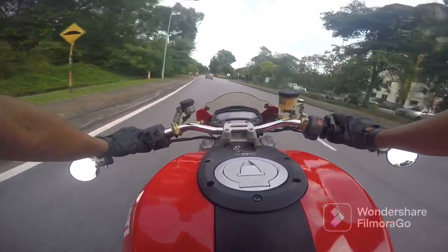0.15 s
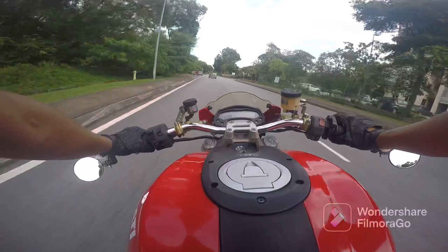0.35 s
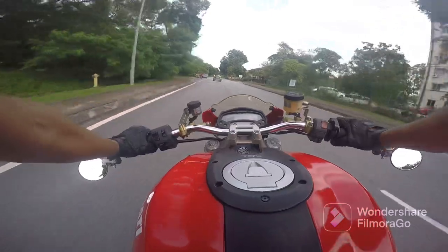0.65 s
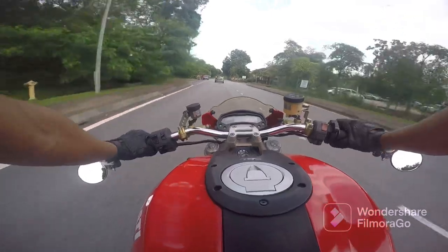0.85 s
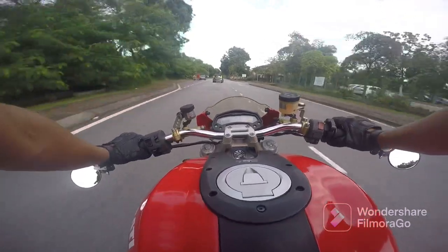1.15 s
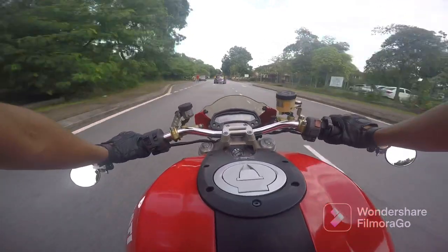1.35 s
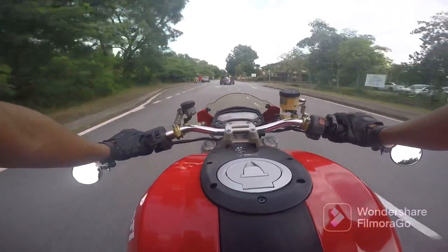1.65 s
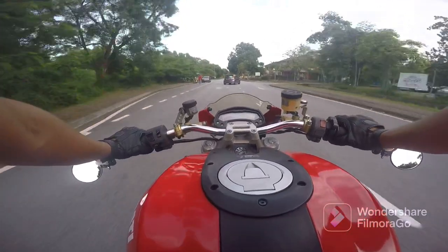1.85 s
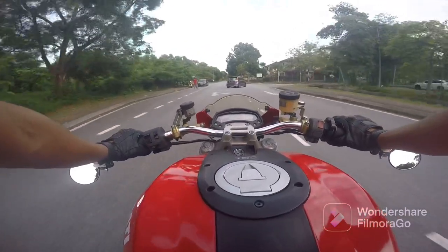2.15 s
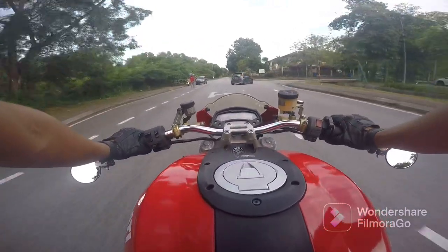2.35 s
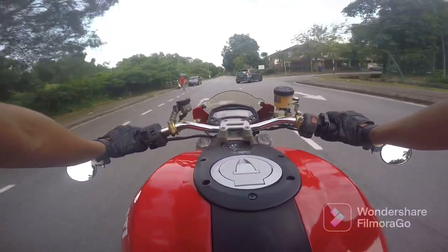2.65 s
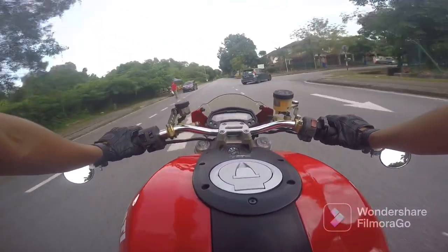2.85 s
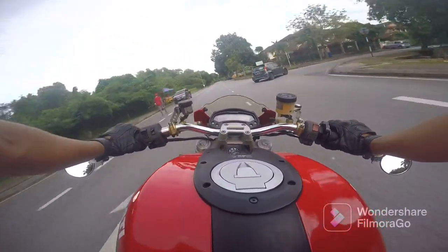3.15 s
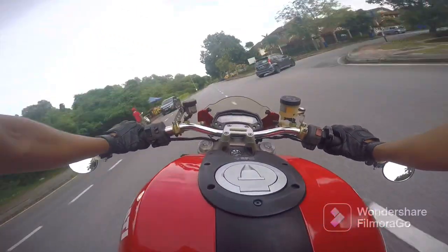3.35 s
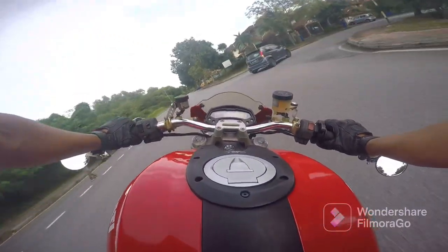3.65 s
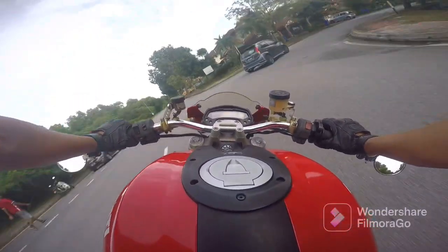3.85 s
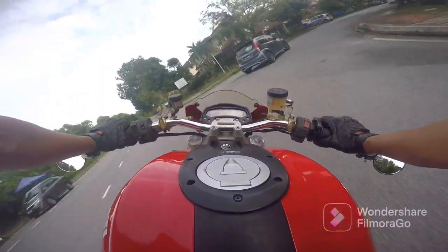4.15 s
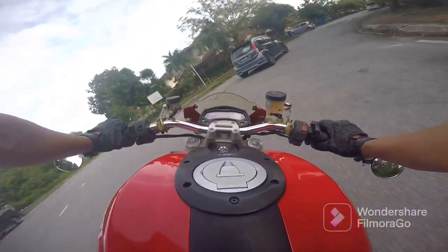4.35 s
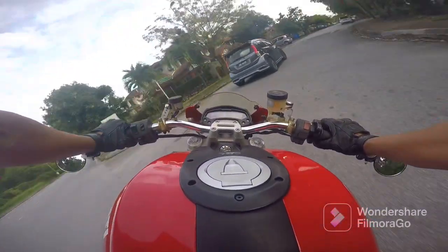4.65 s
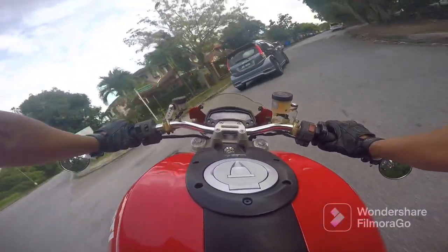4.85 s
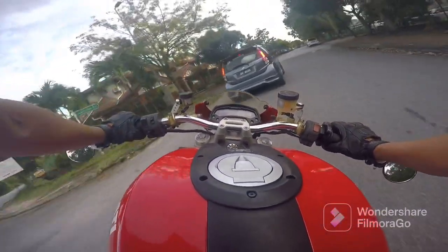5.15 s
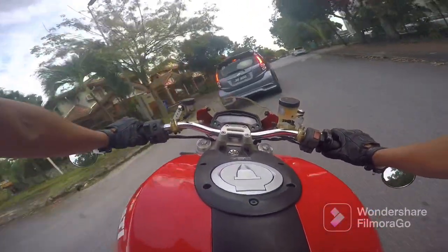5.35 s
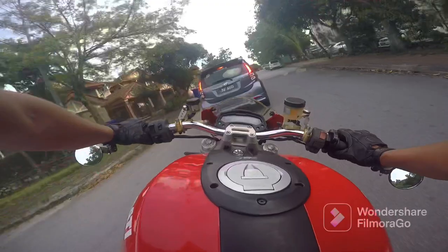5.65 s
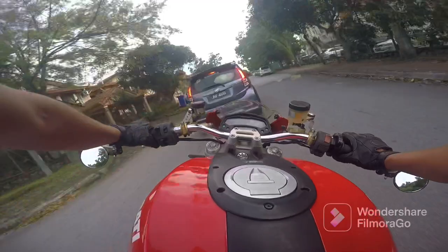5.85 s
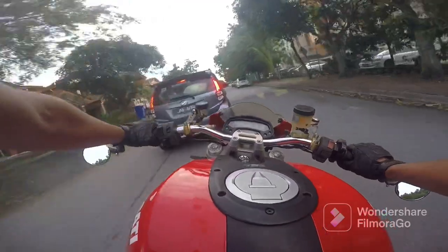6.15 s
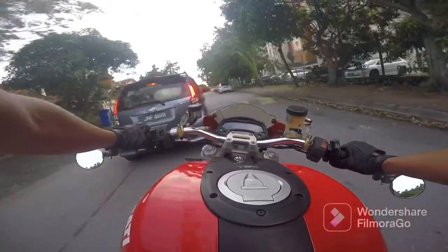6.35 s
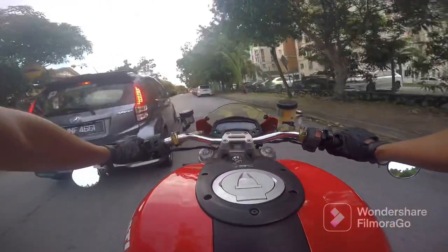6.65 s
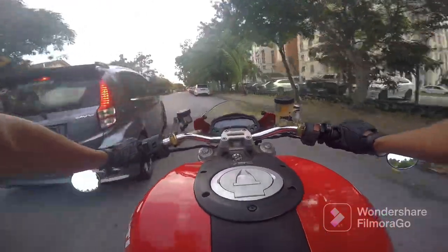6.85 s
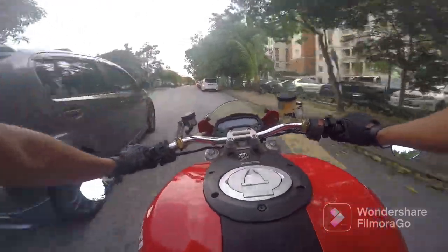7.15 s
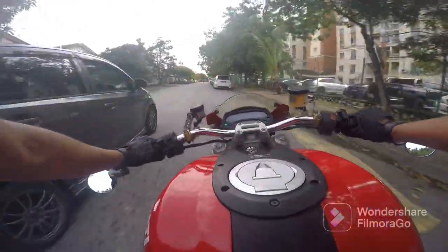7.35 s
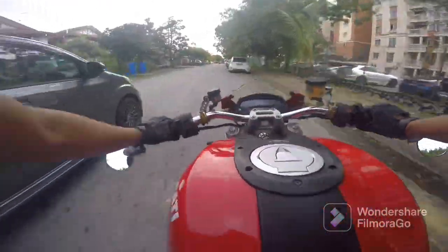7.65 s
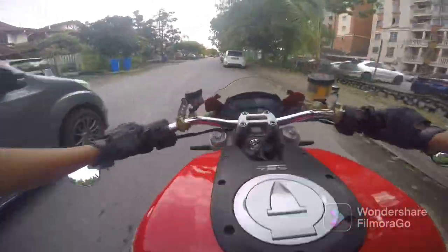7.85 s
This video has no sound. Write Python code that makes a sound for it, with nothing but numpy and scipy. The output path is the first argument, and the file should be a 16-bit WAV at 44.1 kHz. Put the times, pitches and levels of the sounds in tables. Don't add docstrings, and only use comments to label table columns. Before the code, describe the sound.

Heard from a sealed microphone on the rider's chest, a twin motorcycle's uneven exhaust beat dominates over metallic engine clatter and low wind buffeting. Two quick blips come early, with crackling pops, then the revs sink steadily through a bend to a slow, loose thudding. A short blip with a bang follows, and firmer, sharper beats pull away beside a car.

```python
import sys
import numpy as np
from scipy import signal
from scipy.fft import rfft, irfft, next_fast_len
from scipy.io import wavfile
from scipy.ndimage import uniform_filter1d

SR = 44100
rng = np.random.default_rng(int(sys.argv[2]) if len(sys.argv) > 2 else 0)


def dump_mix(stems):
    frames = np.atleast_2d(stems).T
    limited = np.clip(frames, -1, 1)
    pcm = np.round(limited * 32767).astype(np.int16)
    wavfile.write(sys.argv[1], SR, pcm)


def amplitude_ratio(level_db):
    exponent = np.asarray(level_db, float) / 20
    return 10 ** exponent


N = 351918
TIME = np.arange(N) / SR

# time_s, rate_hz (four-stroke cycles per second)
ENGINE_SPEED = [(0.0, 29.08), (0.568, 26.89), (0.7, 26.97), (0.815, 31.5), (1.037, 24.78), (1.234, 31.06),
                (1.926, 28.25), (3.049, 25.07), (3.749, 24.26), (4.495, 21.1), (5.662, 14.94),
                (6.011, 14.93), (6.355, 12.2), (6.442, 17.42), (6.539, 17.33), (6.794, 13.88),
                (7.055, 12.99), (7.804, 15.3), (7.98, 14.1)]


def curves(table):
    s, *columns = np.transpose(table)
    return [np.interp(TIME, s, c) for c in columns]


def unit(x):
    return x / np.sqrt(np.mean(x ** 2))


def ring(x, hz, width):
    r = np.exp(-np.pi * width / SR)
    w = 2 * np.pi * hz / SR
    return signal.lfilter([0, r * np.sin(w)], [1, -2 * r * np.cos(w), r * r], x)


def body(x, modes):
    return sum(amplitude_ratio(db) * ring(x, hz, width) for hz, width, db in modes)


def clicks(times, sizes):
    place = np.clip(np.asarray(times) * SR, 0, N - 2)
    i, part = place.astype(int), place % 1
    return np.bincount(i, sizes * (1 - part), N) + np.bincount(i + 1, sizes * part, N)


def colour(x, points):
    hz, db = np.transpose(points)
    size = next_fast_len(N)
    f = np.log(np.maximum(np.arange(size // 2 + 1) * SR / size, 1))
    gain = amplitude_ratio(np.interp(f, np.log(hz), db))
    return irfft(rfft(x, size) * gain, size)[:N]


def walk(rate):
    k = int(SR / rate)
    steps = np.repeat(rng.standard_normal(N // k + 1), k)
    return unit(uniform_filter1d(uniform_filter1d(steps, k), k)[:N])


def soften(x, top_hz, order=2):
    return signal.sosfilt(signal.butter(order, top_hz, fs=SR, output="sos"), x)


def fade(x, tau_s):
    return signal.lfilter([1], [1, -np.exp(-1 / (tau_s * SR))], x)


def hump(start_s, peak_s, end_s, db):
    return db * np.interp(TIME, [start_s, peak_s, end_s], [0, 1, 0])


def opening_db():
    return 4 * np.exp(-TIME / .004)


def cooling():
    return hump(4.7, 5.03, 6.3, 0.73)


def wind():
    # time_s, level_db
    gust = [(0, -31), (1.3, -46), (3.5, -42.5), (4.25, -42.5), (4.9, -44.5), (6.3, -46.5), (7.4, -46.5),
            (7.98, -46)]
    # frequency_hz, density_db
    buffeting = [(12, -18), (28, 9.5), (48, 1), (70, -8), (120, -10), (200, -33), (500, -31), (1000, -56.5)]
    level_db = curves(gust)[0] + opening_db() + 1.5 * walk(5.0)
    return amplitude_ratio(level_db) * unit(colour(rng.standard_normal(N), buffeting))


def whistle():
    return amplitude_ratio(-97) * np.sin(2 * np.pi * 15081 * TIME)


def grit():
    # time_s, level_db
    specks = [(6.1816, -68), (6.2016, -65), (6.3912, -66), (6.4141, -63), (6.9349, -70), (7.0083, -69),
              (7.0542, -71), (7.0891, -71), (7.132, -72), (7.1614, -68), (7.2343, -70), (7.4942, -65),
              (7.5331, -60), (7.6378, -64), (7.7301, -66), (7.789, -65), (7.8608, -62), (7.9232, -61)]
    # time_s, level_db
    scuffs = [(6.38, -64), (6.405, -66), (6.414, -68), (7.232, -63), (7.24, -60), (7.493, -60),
              (7.897, -55), (7.925, -60)]
    # time_s, level_db
    pings = [(7.232, -56), (7.243, -72), (7.255, -75), (7.28, -73), (7.288, -73), (7.38, -77)]
    speck_hue = [(8000, -25), (10300, -7), (12500, 0), (15000, -6)]
    scuff_hue = [(4800, -25), (6000, -2), (7500, 4), (9500, -17), (12000, -25)]
    layers = 0
    for table, tau_s, points in ((specks, .005, speck_hue), (scuffs, .009, scuff_hue)):
        when, db = np.transpose(table)
        envelope = fade(clicks(when, amplitude_ratio(db - 4.5)), tau_s)
        layers = layers + envelope * unit(colour(rng.standard_normal(N), points))
    when, db = np.transpose(pings)
    return layers + ring(clicks(when, amplitude_ratio(db)), 12450, 45)


def ticks():
    # time_s, level_db
    rattles = [(.001, -41), (0.169, -37), (.35, -52), (.75, -41), (.79, -43), (6.384, -51), (6.404, -40),
               (6.41, -54), (7.232, -50), (7.535, -45)]
    hue = [(500, -18.0), (900, -1), (1600, 15.5), (2000, 13), (2450, 25), (3000, 8.5),
           (3800, 16), (4800, -18), (9000, -40)]
    when, db = np.transpose(rattles)
    rise_s, decay_s = .0015, .003
    burst = unit(fade(fade(clicks(when, amplitude_ratio(db)), decay_s), rise_s)) * amplitude_ratio(-63)
    return burst * unit(colour(rng.standard_normal(N), hue))


def gears(turn):
    # time_s, level_db
    whine = [(0, -55), (2.4, -59.5), (2.75, -56), (3.15, -53), (3.4, -59), (4.3, -60), (4.7, -58.5),
             (5.2, -76), (7.98, -87)]
    wobble = np.cumsum(25 * walk(30) + 70 * walk(350)) / SR
    return amplitude_ratio(curves(whine)[0] + 2.1 * walk(60)) * np.sin(2 * np.pi * (65 * turn + wobble))


def drone(turn):
    crest_turn, cold_shift_turn = .11, .045
    warm_share, braking_ends_s = .45, 5.4
    cold = cooling()
    braking = np.clip(2 * (braking_ends_s - TIME), 0, 1)
    share = np.maximum(cold, warm_share * braking)
    return amplitude_ratio(-33) * share * np.cos(2 * np.pi * 3 * (turn + crest_turn + cold_shift_turn * cold))


def clatter(turn, count=48):
    # time_s, level_db
    rattle = [(0, -45), (1.2, -45), (2.4, -46), (3.6, -46.5), (4.8, -49), (5.8, -52), (6.31, -52),
              (6.41, -49.5), (6.75, -51), (7.3, -50), (7.8, -48.5), (7.98, -46)]
    # frequency_hz, width_hz, level_db
    case_modes = [(760, 140, -10.5), (1028, 157, -8.5), (1287, 210, -13), (1694, 147, -8.5),
                  (1872, 267, -8.5), (2292, 82, -3), (2529, 257, -3.5), (3378, 305, -6.5), (3656, 160, -2),
                  (4077, 447, -6.5), (4590, 35, -9)]
    # frequency_hz, start_s, peak_s, end_s, level_db
    case_swells = [(2407, -0.5, 1.8, 2.5, 1), (3650, -2.1, 1.4, 5.3, 0), (3370, 1.5, 3.5, 5.5, 2.5),
                   (1026, 1, 1.7, 4.3, 1.5), (773, 0.5, .01, 0.078, 24), (3370, 0, 0.98, 1.4, -5),
                   (1257, 5, 7.2, 10, -3.0), (3370, 6, 6.42, 7.7, 1)]
    # frequency_hz, density_db
    treble_hue = [(4300, 11.5), (4900, -27), (5250, -16), (5630, -2.5), (5900, -12), (6280, -4), (6900, -5),
                  (7460, -2.5), (8200, -10), (9000, -11), (10000, -20)]
    # frequency_hz, density_db
    top_hue = [(8500, -38), (9900, 7.5), (10600, 4), (11500, 5), (12300, -6), (13200, 0), (15100, -22),
               (15400, -36)]

    clatter_db = curves(rattle)[0] + opening_db()
    bright_db = clatter_db + .3 * (clatter_db - np.median(clatter_db))
    scrub_db = hump(2.4, 4.4, 6.0, 3.5)
    reflected_db = hump(7.1, 7.8, 9.9, 8.5)
    slowing_db = hump(4.8, 6.7, 7.4, -4)
    treble_db = bright_db - 16 + scrub_db
    top_db = bright_db - 35 + .5 * scrub_db + reflected_db + slowing_db

    angle, size = rng.random(count), rng.standard_normal(count)
    chance = rng.standard_normal((int(turn[-1]) + 1, count, 2))
    strike_turn = np.arange(len(chance))[:, None] + angle + 0.0013 * chance[..., 0]
    when = np.interp(strike_turn, turn, TIME)
    strength = size * amplitude_ratio(0.29 * chance[..., 1])
    taps = unit(clicks(when.ravel(), strength.ravel()))

    throb_db = np.interp(curves(ENGINE_SPEED)[0], [13, 18], [1.8, .8])
    throb = np.cos(2 * np.pi * (turn + .12)) + .6 * np.cos(4 * np.pi * (turn + .07))
    swell = amplitude_ratio(throb_db * throb)
    shudder_db = 0.2 * walk(16)

    mids = 0
    for hz, width, db in case_modes:
        drive = swell * (.65 * min(hz / 1700, 1) * taps + rng.standard_normal(N))
        case_swell_db = sum(hump(*span) for near, *span in case_swells if abs(hz / near - 1) < .06)
        tone = unit(ring(ring(drive, hz, 1.48 * width), hz, 1.48 * width))
        level_db = db + case_swell_db + 1.35 * walk(2.967) + 1.0 * walk(14)
        mids = mids + amplitude_ratio(level_db) * np.sqrt(width) * tone

    hiss, fizz = (swell ** .6 * amplitude_ratio(.8 * walk(24)) * (0.6 * taps + rng.standard_normal(N)) for _ in range(2))
    treble = unit(colour(hiss, [(3500, -57)] + treble_hue + [(12000, -57)]))
    top = unit(colour(fizz, [(7000, -50)] + top_hue))
    return amplitude_ratio(shudder_db) * (amplitude_ratio(clatter_db) * unit(mids) + amplitude_ratio(treble_db) * treble + amplitude_ratio(top_db) * top)


def firings(turn):
    # time_s, level_db
    load = [(0, -33), (.5, -33), (.62, -34.5), (.75, -39.5), (.84, -35.5), (1.0, -33.5), (1.3, -33.5),
            (1.9, -31.5), (4.3, -34), (4.7, -31.5), (4.9, -32.5), (5.4, -36.5), (5.55, -41.5), (5.7, -39),
            (5.85, -46.5), (6.03, -34), (6.13, -53), (6.29, -40), (6.42, -28), (6.5, -37), (6.6, -36.5),
            (6.7, -41), (6.91, -31.5), (7.98, -31)]
    # time_s, scatter_db
    scatter = [(0, 1.3), (.7, 1.3), (.85, .8), (1.2, .7), (2.3, 1.0), (4.9, 1.1), (5.4, 2.5), (6.7, 2.5),
               (6.9, 1.4), (7.98, 1.4)]
    # time_s, share of the early lead
    front_haste = [(0, 1), (.8, 1), (.93, .1), (1.1, .1), (1.2, 1), (1.5, 1), (2.1, .2), (4.6, .1),
                   (5.4, 1), (7.98, 1)]
    # time_s, edge_db
    front_choke = [(0, -2), (1.3, -2), (1.6, -11), (4.2, -14), (5.6, -8), (6.6, 0), (7.98, 0)]
    front_lead_turn = 3 / 8
    lead_s = .0031
    thump_early_s, crack_early_s = .0006, .0011

    thump_db, scatter_db = curves(load)[0], curves(scatter)[0]
    haste, choke_db = curves(front_haste)[0], curves(front_choke)[0]
    octaves = np.log2(curves(ENGINE_SPEED)[0] / 25)
    pull_away = np.clip((TIME - 6.78) / .15, 0, 1)
    crack_db = thump_db + np.maximum(-17.5 + 15 * octaves, -29.5) + 6.5 * pull_away - 5 * cooling()
    crack_db = crack_db + hump(.82, .93, 1.12, 4)

    cycle = np.arange(1, int(turn[-1]) + 2)
    chance = rng.standard_normal((2, len(cycle), 3))
    late_s = .0002 * chance[::-1, :, 2]
    thump = crack = edge = swell = 0
    for front in (0, 1):
        firing_turn = cycle - front * front_lead_turn + .003 * chance[front, :, 0]
        when = np.interp(firing_turn, turn, TIME, right=9)
        i = np.minimum(when * SR, N - 1).astype(int)
        luck_db = scatter_db[i] * chance[front, :, 1]
        push_db = thump_db[i] + 6.5 + front + .55 * (1.5 + .5 * front) * luck_db
        push = clicks(when - lead_s - front * thump_early_s, amplitude_ratio(push_db))
        thump = thump + push
        swell = swell + .5 ** front * push
        stroke_db = crack_db[i] + 14.0 - 2.5 * front + luck_db + 1.94 * chance[front, :, 2]
        stroke_s = when + late_s[front] - lead_s - front * crack_early_s * haste[i]
        stroke = clicks(stroke_s, amplitude_ratio(stroke_db))
        crack = crack + stroke
        edge = edge + amplitude_ratio(front * choke_db) * stroke
    return thump, crack, edge, swell


def afterburning():
    # time_s, crack_db, sharpness (0-1)
    pop_table = [(0.1695, -22, 1), (0.347, -23.5, 1), (0.624, -36, .2), (0.676, -33, .15), (0.6965, -25, 1),
                 (0.7335, -24, .9), (0.7465, -21.5, .9), (0.7672, -23, 1), (0.779, -28, .6),
                 (0.799, -33, .15), (1.105, -33, .4), (2.39, -31, 1), (3.083, -31, 1), (3.858, -36, 1),
                 (4.071, -36, 1), (4.9, -46, .2), (5.07, -43, .3), (5.51, -46, .2), (5.614, -44, .3),
                 (5.679, -49, .3), (5.711, -44, .7), (5.813, -50, .3), (5.978, -44, .4), (6.022, -44, .3),
                 (6.164, -49, .2), (6.393, -33, 1), (6.415, -37, .6), (6.47, -41, .3), (6.563, -39, .3),
                 (6.648, -44, .1), (6.758, -43, .5)]
    # time_s, thump_db
    bang_table = [
        (5.711, -32),
        (6.396, -32),
        (6.45, -26),
    ]
    when, pop_db, sharp = np.transpose(pop_table)
    size = amplitude_ratio(pop_db - 2.5)
    pops = clicks(when + .0025, sharp * size)
    muffled = clicks(when + .0025, (1 - sharp) * size)
    when, bang_db = np.transpose(bang_table)
    return pops, muffled, clicks(when, amplitude_ratio(bang_db))


def exhaust(turn):
    # frequency_hz, width_hz, level_db
    silencer_modes = [(68.1, 18, -3), (85.6, 15, -19.5), (122, 61, -9)]
    # frequency_hz, width_hz, level_db
    header_modes = [(325, 134, 2.5), (415, 340, 4.5), (785, 680, -2)]
    # frequency_hz, width_hz, level_db
    lingering_modes = [(285, 28.5, -1), (326, 26.3, -5)]
    # time_s, level_db
    heat = [(0, -11.5), (.3, -8.5), (.58, -13.5), (.64, 1.5), (.82, 2), (.88, -9.5), (1.3, -6.5),
            (1.7, -16.5), (2.3, -9), (2.8, -5), (3.6, -7), (4.6, -15.5), (5.4, 1.5), (6.7, 0.5), (7.0, 3.5),
            (7.98, 5)]
    # time_s, tilt_db
    ring_tilt = [(0, 0), (.45, -3), (.7, -3), (.76, 4), (.82, 4), (.9, -2), (1.2, -5), (2.0, -4), (2.6, 0),
                 (4.8, 0), (5.4, -5), (6.1, -4), (6.2, -1), (6.4, -5), (6.8, -5), (7.1, -3), (7.98, -2)]

    thump, crack, edge, swell = firings(turn)
    pops, muffled, bangs = afterburning()
    thump, crack = thump + bangs, crack + pops
    blunt = amplitude_ratio(hump(4.3, 5.7, 6.9, -9)) * edge + pops
    heat_db, tilt_db = curves(heat)[0], curves(ring_tilt)[0]

    churn = amplitude_ratio(-44) * fade(thump, .025) * rng.standard_normal(N)
    singing = amplitude_ratio(-89 + hump(5.4, 6.2, 6.9, 7))
    rasp = (amplitude_ratio(-36) * fade(crack + muffled, .02) + singing) * rng.standard_normal(N)

    build_up = .5 * fade(swell[::-1], 0.0018)[::-1]
    echo = 0.22 * np.roll(thump, int(.0155 * SR))
    gas, cold = thump + echo + churn, cooling()
    cold_modes = [(0.96 * hz, width, db) for hz, width, db in silencer_modes]
    silencer = body(gas * (1 - cold), silencer_modes) + body(gas * cold, cold_modes)
    boom = soften(build_up - silencer, 190, order=4)

    snap = amplitude_ratio(-11.0) * soften(body(pops * amplitude_ratio(-.8 * heat_db), header_modes), 1500)
    hot_gas = amplitude_ratio(heat_db) * (crack + muffled + rasp)
    lower_note = body(hot_gas * amplitude_ratio(-.5 * tilt_db), lingering_modes[:1])
    upper_note = body(hot_gas * amplitude_ratio(tilt_db), lingering_modes[1:])
    header = soften(body(blunt, header_modes) + lower_note + upper_note, 347)

    pipes = boom + snap + header
    shadow_hz, shadow_width_hz = 185, 45
    shadowed = signal.lfilter(*signal.iirpeak(shadow_hz, shadow_hz / shadow_width_hz, SR), pipes)
    tail = -amplitude_ratio(-25) * np.exp(-TIME / .003) * np.cos(2 * np.pi * 320 * TIME)
    return tail + pipes - .4 * shadowed


def crank():
    turn = -.05 + np.cumsum(curves(ENGINE_SPEED)[0]) / SR
    since = TIME - 6.92
    onset = np.clip(1 + 8 * since, 0, 1)
    decay = np.exp(-np.maximum(since, 0) / .9)
    return turn - .02 * onset * decay * np.cos(2 * np.pi * 3.2 * since)


def scene():
    turn = crank()
    air = wind() + whistle()
    loose_parts = grit() + ticks()
    engine = gears(turn) + drone(turn) + clatter(turn) + exhaust(turn)
    return (air + loose_parts + engine)[None]


def low_pass(x):
    return signal.sosfilt(signal.butter(12, 15270, fs=SR, output="sos"), x)


def record(dry):
    wet = signal.sosfilt(signal.butter(2, 18, "high", fs=SR, output="sos"), dry)
    return low_pass(wet)


dry = scene()
out = record(dry)
dump_mix(out)
```